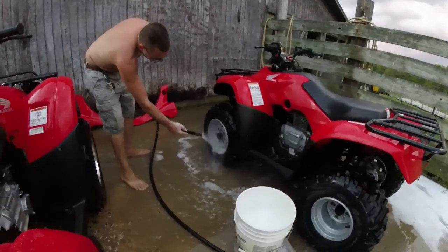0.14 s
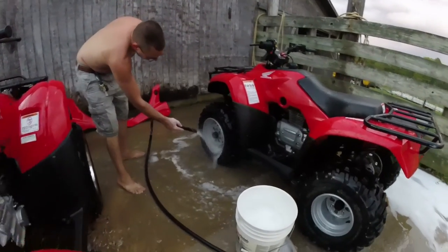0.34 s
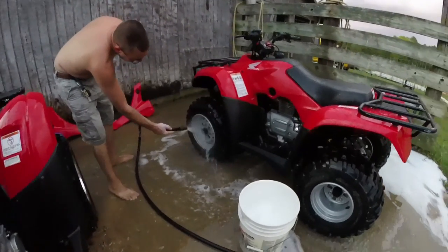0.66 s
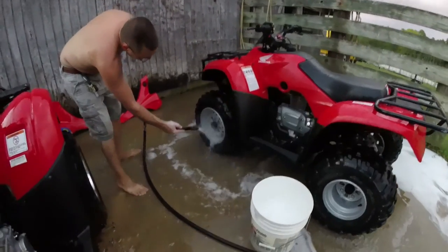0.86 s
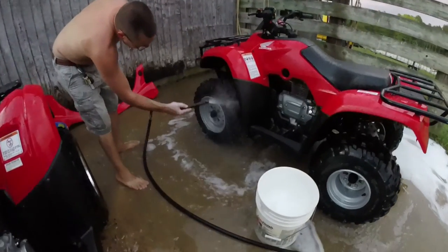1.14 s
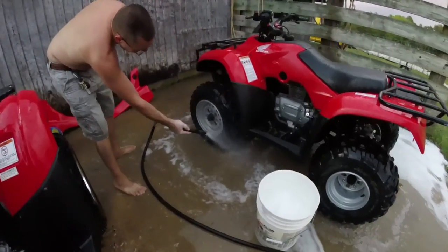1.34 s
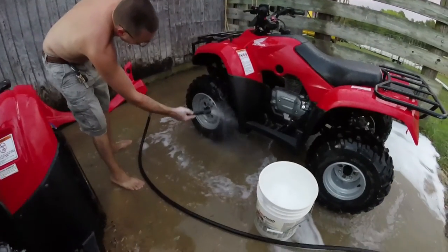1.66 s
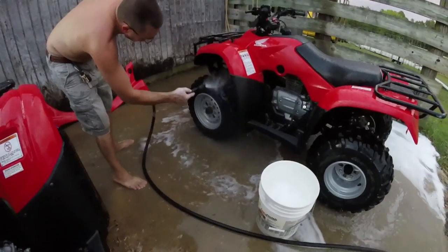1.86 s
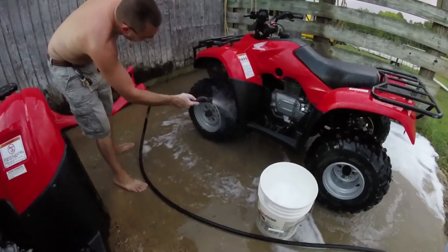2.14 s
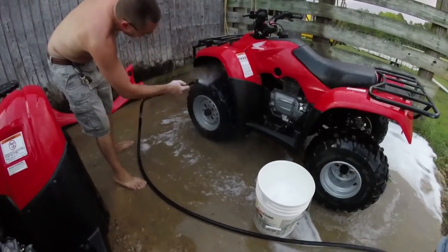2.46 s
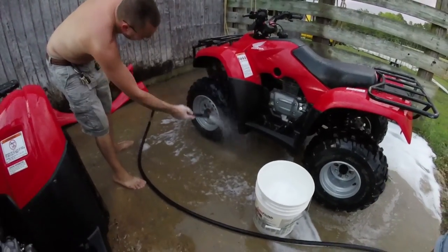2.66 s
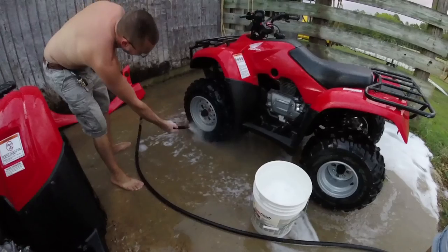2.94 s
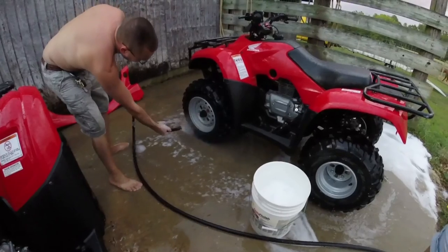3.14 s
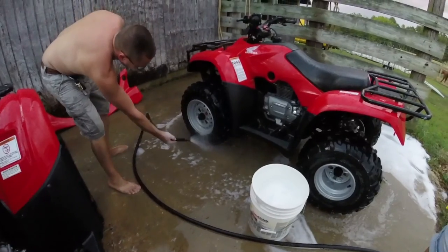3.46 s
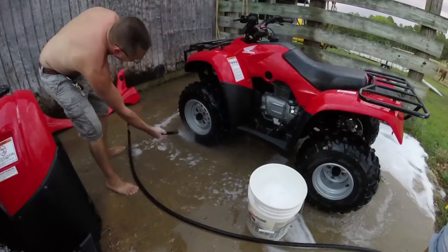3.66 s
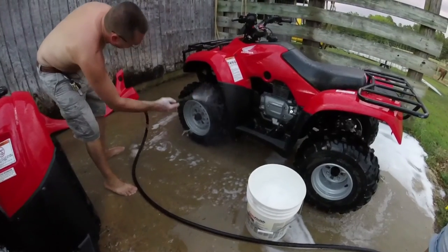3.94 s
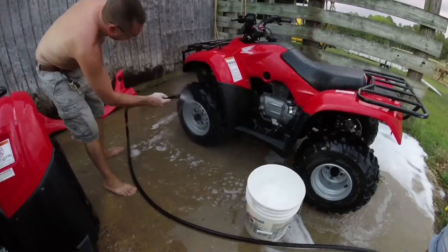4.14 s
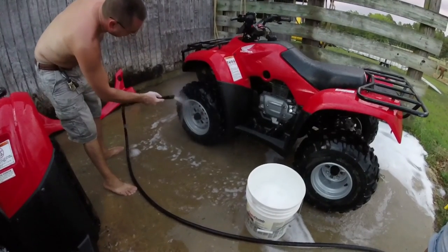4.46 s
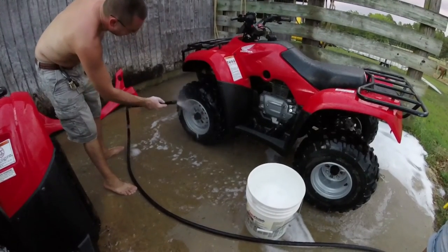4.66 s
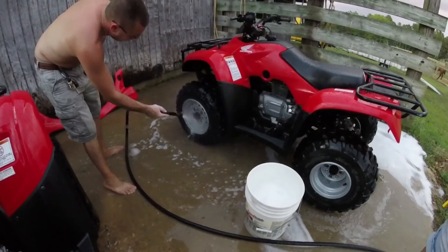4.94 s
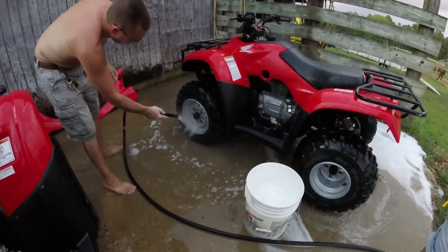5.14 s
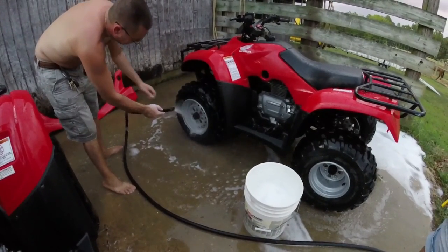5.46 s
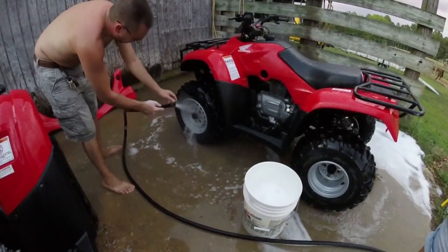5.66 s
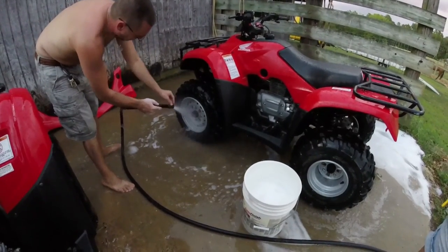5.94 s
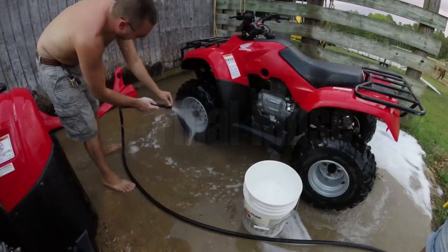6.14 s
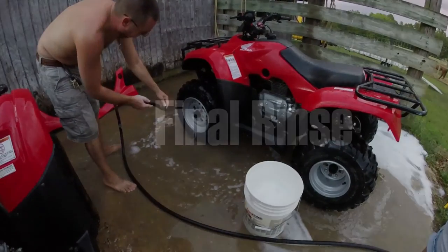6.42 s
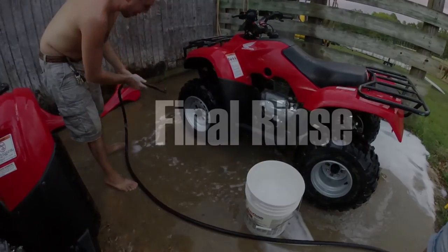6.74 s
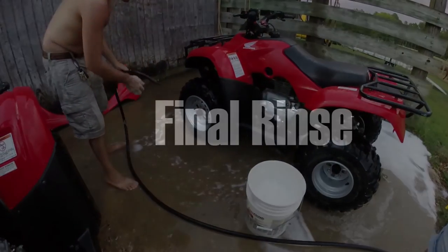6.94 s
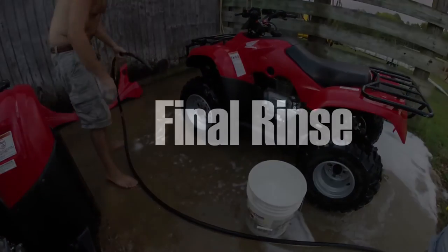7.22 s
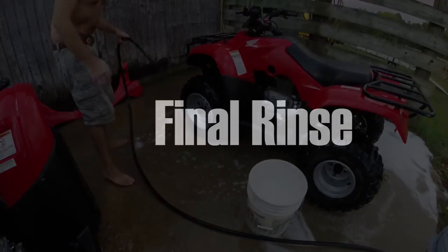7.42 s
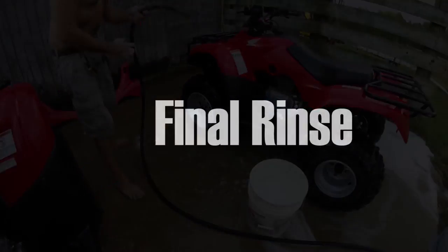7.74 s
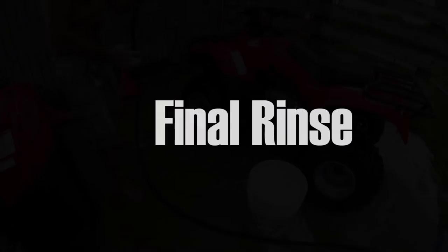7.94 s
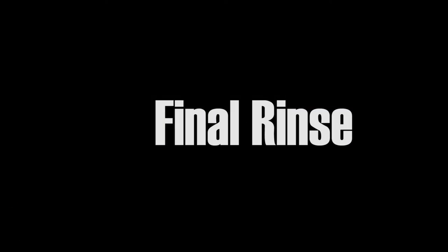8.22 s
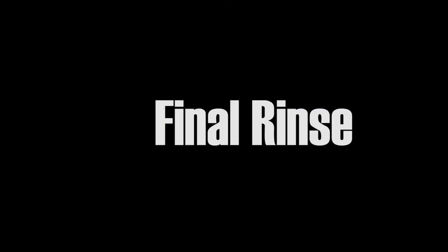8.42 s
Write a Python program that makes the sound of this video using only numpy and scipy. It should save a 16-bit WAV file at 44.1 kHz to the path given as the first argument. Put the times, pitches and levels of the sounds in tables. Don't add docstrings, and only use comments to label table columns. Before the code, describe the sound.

A hose jet hisses and drums over a small vehicle's tyre and metal rim outdoors, then shuts off to faint whistle, clicks and insect buzz.

```python
import sys
import numpy as np
from scipy import signal
from scipy.fft import rfft, irfft
from scipy.io import wavfile
from scipy.ndimage import uniform_filter1d

SR = 44100
rng = np.random.default_rng(int(sys.argv[2]) if len(sys.argv) > 2 else 0)


def unload_audio(sound):
    columns = np.transpose(np.atleast_2d(sound))
    steps = np.round(np.clip(columns, -1, 1) * 32767)
    wavfile.write(sys.argv[1], SR, steps.astype(np.int16))


def level_to_linear(level):
    exponent = np.asarray(level, float) / 20
    return 10 ** exponent


N = 378378

# t/s, share on rubber 0-1, force on the wheel level/dB
AIM = [(0.0, 0, -1.5), (.4, 0.06, -1), (.93, 0.4, 1.5), (1.0, .6, -0.5), (1.3, 0.82, -1.5), (1.5, 0.77, -3),
       (1.68, 1, 0), (2.66, 0.96, 0), (2.72, 0.68, -3), (3.15, 0.57, -3), (3.8, 0.57, -3.5), (3.9, 1, 0.5),
       (4.35, 0.94, -0.5), (4.5, 0.59, -1), (5.1, 0.59, 1), (5.5, 0.47, -0.5), (5.9, 0.44, -0.5),
       (6.3, 0.3, 0.5)]
# t/s, length t/s, splatter level/dB, mist level/dB
RIM_SWEEPS = [(.22, .05, 2.5, 0), (.38, 0.044, 3.5, 0), (.49, 0.027, 4.5, 2), (.77, .07, -0.5, -3),
              (.85, 0.051, 2, 3), (.91, 0.045, 4, 0), (1.09, 0.083, 3.5, 1.5), (1.24, .08, 2, -0.5),
              (1.41, 0.072, 3, 4), (2.03, 0.066, 1, 3), (2.58, 0.041, 0.5, 1.5), (2.87, 0.058, 1, 3),
              (2.98, .22, 4, 2), (3.29, 0.091, 4, 2.5), (3.54, 0.098, 2.5, 1.5), (3.775, .06, 7, 4.5),
              (3.87, 0.054, -0.5, 2.5), (4.04, 0.062, 2, 2), (4.2, .06, 3, 4), (4.43, 0.076, -2.5, -6.5),
              (4.67, 0.059, 0, 0.5), (5.0, 0.029, 3, 1.5), (5.205, .06, 5.5, 3), (5.28, 0.069, 4, 1),
              (5.4, 0.057, 4.5, 2.5), (5.47, 0.07, 4.5, 1), (5.6, 0.034, 3.5, 0.5), (5.71, 0.039, 2, 1),
              (5.815, .05, 4, 1), (6.25, .08, 2, 0)]
# t/s, length t/s, drumming level/dB, extra boom level/dB
TYRE_SWEEPS = [(.85, .1, 1, 4), (1.13, .08, -1.5, 13.5), (1.25, .1, 3.5, 1.5), (1.38, .07, -5, 9),
               (1.46, 0.15, 0, -11), (1.76, .04, -2.5, -2), (1.93, .06, -2, 6), (2.38, .04, -3.5, 7.5),
               (2.43, .04, 1, -4), (2.63, .12, 3.5, -1.5), (2.97, .12, 7, 2.5), (3.05, .06, 1, 7),
               (3.13, .07, -2, -6), (3.32, .18, 5.5, 4), (3.55, .09, 6.5, 0), (3.76, .06, 3.5, 8),
               (3.83, .04, -2, -10), (4.0, 0.13, 0, 2.5), (4.09, .08, 1, 2), (4.17, .04, -0.5, -6),
               (4.23, .05, 3, 0), (4.325, 0.045, 3.5, 2.5), (4.41, .05, -3.5, -0.5), (4.47, .04, 7.5, -10),
               (5.22, .04, 4, 0), (5.28, .05, 4.5, -6.5), (5.33, .04, -1.5, 5), (5.39, .08, 4.5, -10),
               (5.66, .07, 2, 3.5), (6.24, .06, 1, 5)]
# t/s, length t/s, level/dB
SPILLS = [
    (1.45, 0.27, 2.5),
    (1.88, 0.35, 4.5),
    (2.3, 0.19, 5.5),
    (2.64, .12, 8),
    (4.33, .1, 3),
    (5.3, 0.09, -1),
    (5.91, 0.11, 5),
]
# f/Hz, level/dB
TREAD_COLOUR = [(450, -32.5), (650, -22), (780, -5.5), (900, 3), (1020, -3.5), (1150, -4), (1350, -14),
                (1700, -21.5), (2500, -39)]
# f/Hz, level/dB
SIDEWALL_COLOUR = [(380, -38.5), (500, -15), (600, -1), (700, 0), (800, -4.5), (950, -20.5), (1300, -41)]
# f/Hz, level/dB per Hz
GLANCING_HIT = [(820, -27.5), (1400, -4), (1750, -10.5), (2120, -4.5), (2880, -12.5), (3120, -6),
                (3730, -8.5), (4200, -3), (5120, -4), (6800, -16), (8840, -39.5), (15000, -120)]
# f/Hz, level/dB per Hz
SQUARE_HIT = [(820, -28), (1400, -4), (1790, -12), (2070, 1.5), (2270, 0.5), (2490, -2.5), (2690, -1),
              (3830, -2), (4170, 0), (5430, -2.5), (6320, -11.5), (6800, -8), (8840, -37), (15000, -120)]
# f/Hz, level/dB per Hz
MIST_COLOUR = [(4500, -26), (5800, -8.5), (6770, -8.5), (7400, -2), (7980, -0.5), (8500, -4.5), (9000, -9),
               (9600, -6.5), (10400, -9), (11800, -9), (13000, -13), (14300, -15.5), (15200, -24),
               (16000, -18.5)]
# f/Hz, level/dB per Hz
PUDDLE_COLOUR = [(76, -34), (130, -3), (140, -6), (172, 2.5), (393, 1.5), (453, 0.5), (600, 0.5),
                 (780, -33), (1320, -120)]
# f/Hz, width f/Hz, level/dB
HUB_MODES = [(1850, 260, 0), (2080, 260, -1), (4400, 450, 0), (1450, 250, -8), (4750, 300, -3),
             (390, 90, -4)]
# t/s, f/Hz, level/dB
WHINE = [
    (6.4, 2060, -80),
    (6.6, 2085, -69),
    (7.3, 2190, -68),
    (8.1, 2250, -67),
]
# t/s, ring peak level/dB, hollow level/dB, ring centre f/Hz, tick level/dB
CLICKS = [(6.399, -48, -60, 4700, -22), (6.434, -51, -60, 7630, -20), (6.499, -43, -60, 4620, -18),
          (6.514, -55, -60, 7500, -20), (6.53, -51, -60, 7830, -12), (6.54, -53, -60, 6500, -12),
          (6.55, -51, -60, 5100, -22), (6.56, -58, -42, 3500, -15), (6.637, -55, -60, 6500, -8),
          (6.745, -60, -52, 3500, -20), (6.757, -45, -58, 3750, -25), (7.74, -50, -55, 7000, -8),
          (7.747, -45, -45, 5500, -7), (7.768, -45, -32, 4540, -9), (7.808, -41, -41, 5000, -19),
          (7.829, -54, -52, 4000, -8), (7.986, -52, -47, 6200, -6), (8.01, -49, -58, 5000, -13)]
# ratio to its centre, level/dB
CLICK_RING = [(.5, -35), (.85, -7), (1, -4), (1.15, -12), (1.6, -35)]
# f/Hz, level/dB
CLICK_TICK = [(2000, -25), (3500, 5), (5000, -5), (8000, -2), (10000, -14), (13500, -22), (14500, -50)]
# f/Hz, level/dB
CLICK_HOLLOW = [(500, -28), (800, 3), (1000, 6), (1300, -3), (1700, -4), (2400, 2), (3000, -5), (4000, -34)]
# f/Hz, level/dB per Hz
YARD_COLOUR = [(90, -23.5), (135, -1.5), (180, -4.5), (215, -20), (340, -17), (560, -20.5), (960, -10.5),
               (1300, -20.5), (1850, -26.5), (2200, -23.5), (2700, -22.5), (3700, -30), (8000, -43),
               (14500, -52.5)]
# f/Hz, width f/Hz, level/dB
HOUSING = (960, 150, -61)
# f/Hz, width f/Hz, level/dB
INSECTS = [(2994, 180, -63), (3214, 230, -64), (3397, 120, -67.5), (7200, 820, -78), (2380, 60, -76.5)]
# t/s, level/dB
BUZZ_SWELL = [
    (0, -3),
    (6.4, -6),
    (6.9, 0),
    (7.5, 1),
    (8.1, 3.5),
]
# f/Hz, level/dB per Hz
RUMBLE_COLOUR = [(8.8, -46), (15, -19), (102, -7), (150, -16), (200, -32), (330, -120)]
# f/Hz, width f/Hz, level/dB
MOTOR = [(56.1, 9, -62.5), (79.5, 10, -74), (115.8, 8.7, -55), (169.2, 46, -60.5)]
# delay t/s, level/dB
ECHOES = [(.0031, -21), (.0074, -20), (.0125, -20), (.0183, -20), (.026, -21), (.039, -22)]
# from f/Hz, share of weakest frames left silent
TREBLE_GAPS = [(12900, .075), (13700, .27), (14400, .45), (15140, 1)]

TREAD_DB, BOOM_DB, RIM_DB, MIST_DB, PUDDLE_DB = (-41, -37.5), (-16.5, -3), (-39, -43), (-42.5, -46), (-45.5, -51)
HAND_TREMOR_DB = 0.5
SHUT_S, SHUT_DB_PER_S = 6.27, 258
HUB_DB, HUB_LEAVE_S, HUB_FADE_S = -39, 0.41, 0.03
LIP_DB, LIP_LEAVE_S, LIP_FADE_S = -47.5, 1, 0.04
YARD_DB, RUMBLE_DB = -50, -52.5
CLICK_T60_S, CLICK_ATTACK_S = 0.049, 0.0022
END_S = 8.054

TIME_S = np.arange(N) / SR
HZ = np.fft.rfftfreq(512, 1 / SR)[:, None]
FRAME_S = np.arange(N // 128 + 2) * 128 / SR


def spray():
    return tyre() + puddle() + rim() + mist()


def tyre():
    drumming = drops(9000, 0.99, 0.48)
    tread = struck(drumming, read(TREAD_COLOUR, HZ), 1.8, 1.2)
    boom_db = between(BOOM_DB) + sweeps(TYRE_SWEEPS, column=3) - 3.5
    boom = struck(drumming, read(SIDEWALL_COLOUR, HZ), 1.2, 2.3)
    level_db = aimed(TREAD_DB, 0.71, -0.008) + sweeps(TYRE_SWEEPS, column=2)
    return level_to_linear(level_db) * (tread + level_to_linear(boom_db) * boom)


def rim():
    level_db = aimed(RIM_DB, 0.71, 0.02) + sweeps(RIM_SWEEPS, column=2)
    square = np.clip((np.interp(FRAME_S, TIME_S, level_db) + 45.5) / 8.1, 0, 1)
    shape_db = (1 - square) * read(GLANCING_HIT, HZ) + square * read(SQUARE_HIT, HZ)
    splatter = struck(drops(24000, 0.82, 0.72), shape_db, 2.2 - 0.45 * square, 0.9 - 0.28 * square)
    return level_to_linear(level_db) * splatter


def mist():
    level_db = aimed(MIST_DB, 0.34, 0.008) + sweeps(RIM_SWEEPS, column=3)
    return level_to_linear(level_db) * struck(drops(30000, 1.1, 0.6), read(MIST_COLOUR, HZ), 1.8, 0.68)


def puddle():
    level_db = aimed(PUDDLE_DB, 1.0, -0.005) + sweeps(SPILLS, column=2)
    return level_to_linear(level_db) * struck(drops(4000, 1.2, 1.0), read(PUDDLE_COLOUR, HZ), 0.64, 1.3)


def hub():
    drive = drops(8000, 1.2, 0.64) * level_to_linear(0.7 * sweeps(RIM_SWEEPS, column=2))
    ring = evened(sum(level_to_linear(db) * resonate(drive, hz, width) for hz, width, db in HUB_MODES))
    lip = resonate(drive, hz=3160, width=350)
    ring_fade = np.clip((HUB_LEAVE_S - TIME_S) / HUB_FADE_S, 0, 1)
    lip_fade = np.clip((LIP_LEAVE_S - TIME_S) / LIP_FADE_S, 0, 1)
    return level_to_linear(HUB_DB) * ring * ring_fade + level_to_linear(LIP_DB) * lip * lip_fade


def whine():
    shut = TIME_S > WHINE[0][0]
    whistle = resonate(rng.standard_normal(N), track(WHINE, column=1), width=40)
    return shut * level_to_linear(track(WHINE, column=2)) * whistle


def clicks():
    out, t = np.zeros(N), np.arange(4096) / SR
    envelope = level_to_linear(-60 * t / CLICK_T60_S) * np.minimum(t / CLICK_ATTACK_S, 1)
    for start_s, ring_db, hollow_db, hz, tick_db in CLICKS:
        noise = rng.standard_normal(len(t))
        ring = colour(noise, np.array(CLICK_RING) * [hz, 1])
        bright = ring + level_to_linear(tick_db + 11.0) * colour(noise, CLICK_TICK)
        burst = level_to_linear(ring_db - 10.0) * bright + level_to_linear(hollow_db - 2.0) * colour(noise, CLICK_HOLLOW)
        out[round(start_s * SR):][:len(t)] += burst * envelope
    return out


def yard():
    wash = level_to_linear(YARD_DB) * struck(rng.standard_normal(N), read(YARD_COLOUR, HZ), 0.46, 1.0)
    insects = level_to_linear(track(BUZZ_SWELL, column=1)) * fuzzy(INSECTS)
    rumble = level_to_linear(RUMBLE_DB) * colour(rng.standard_normal(N), RUMBLE_COLOUR)
    return wash + fuzzy([HOUSING]) + insects + rumble + fuzzy(MOTOR)


def walls(x):
    taps = np.zeros(SR // 20)
    taps[0] = 1
    for delay_s, db in ECHOES:
        taps[round(delay_s * SR)] = level_to_linear(db)
    return signal.oaconvolve(x, taps / np.linalg.norm(taps))[:N]


def drops(per_s, spread_db, gust_db):
    size = level_to_linear(spread_db * np.minimum(rng.exponential(1, N), 5))
    lands = rng.random(N) < per_s / SR
    return evened(size * lands * rng.standard_normal(N) * level_to_linear(gust_db * drift(size=300)))


def struck(drive, shape_db, slow_db, quick_db):
    z = signal.stft(drive, nperseg=512, noverlap=384)[2]
    gain = level_to_linear(shape_db + slow_db * patches(wide=3, long=70) + quick_db * patches(wide=5, long=12))
    gain = gain / np.sqrt((gain ** 2).mean(0))
    return evened(signal.istft(z * gain[:, :z.shape[1]], nperseg=512, noverlap=384)[1][:N])


def patches(wide, long):
    field = rng.standard_normal((len(HZ), len(FRAME_S)))
    for size, axis in ((long, 1), (long, 1), (wide, 0), (wide, 0)):
        field = uniform_filter1d(field, size, axis=axis)
    return evened(field)


def sweeps(rows, column):
    t = np.arange(0, N, 32) / SR
    out = np.zeros(len(t))
    for row in rows:
        out += row[column] * np.exp(-4 * ((t - row[0]) / max(row[1], 0.01)) ** 2)
    return np.interp(TIME_S, t, out)


def between(ends_db):
    return ends_db[0] + (ends_db[1] - ends_db[0]) * track(AIM, column=1)


def aimed(ends_db, force_share, lag_s):
    closing_s = np.maximum(TIME_S - SHUT_S - lag_s, 0)
    steady_db = between(ends_db) + force_share * track(AIM, column=2)
    return steady_db + HAND_TREMOR_DB * drift(size=1500) - SHUT_DB_PER_S * closing_s


def fuzzy(lines):
    return sum(level_to_linear(db) * resonate(rng.standard_normal(N), hz, width) for hz, width, db in lines)


def resonate(x, hz, width):
    turn = np.exp(2j * np.pi * np.cumsum(hz * np.ones(len(x))) / SR)
    r = np.exp(-np.pi * width / SR)
    smooth = signal.lfilter([1], np.convolve([1, -r], [1, -r]), x * turn.conj())
    return evened((turn * smooth).real)


def colour(x, points):
    gain = level_to_linear(read(points, np.fft.rfftfreq(len(x), 1 / SR)))
    return evened(irfft(rfft(x) * gain, len(x)))


def read(points, at):
    f, value = np.transpose(points)
    return np.interp(np.log(at + 1e-3), np.log(f), value)


def track(rows, column):
    rows = np.array(rows)
    return np.interp(TIME_S, rows[:, 0], rows[:, column])


def drift(size):
    return evened(uniform_filter1d(uniform_filter1d(rng.standard_normal(N), size), size))


def evened(x):
    return x / np.sqrt(np.mean(x ** 2) + 1e-20)


def scene():
    mono = walls(spray() + hub() + yard() + whine()) + clicks()
    return np.array([mono, mono])


def thin_treble(x):
    hz, _, z = signal.stft(x, SR, nperseg=2048, noverlap=1024)
    keep = np.ones(z.shape[1:])
    for (lo_hz, share), (hi_hz, _) in zip(TREBLE_GAPS, TREBLE_GAPS[1:] + [(SR, 0)]):
        band = (hz >= lo_hz) & (hz < hi_hz)
        power = (abs(z[0, band]) ** 2).mean(0)
        keep[band] = power > np.quantile(power, share)
    return signal.istft(z * keep, nperseg=2048, noverlap=1024)[1][:, :N]


def roll_off(x):
    return signal.sosfilt(signal.butter(12, 15180, fs=SR, output="sos"), x)


def record(dry):
    mix = thin_treble(dry) * np.clip((END_S - TIME_S) / 0.0003, 0, 1)
    return roll_off(mix)


dry = scene()
out = record(dry)
unload_audio(out)
```